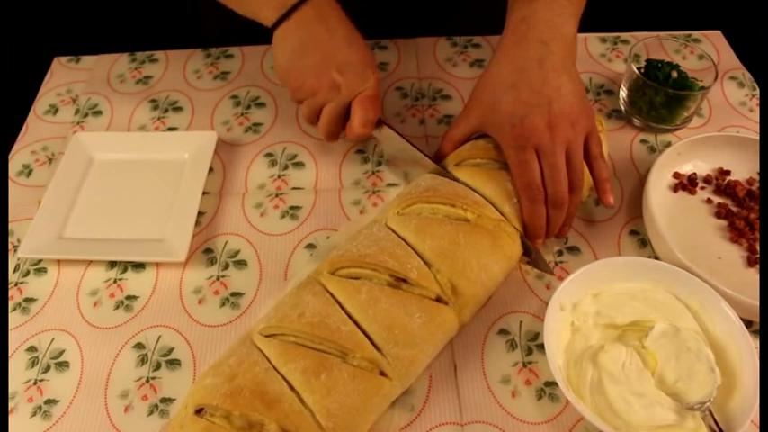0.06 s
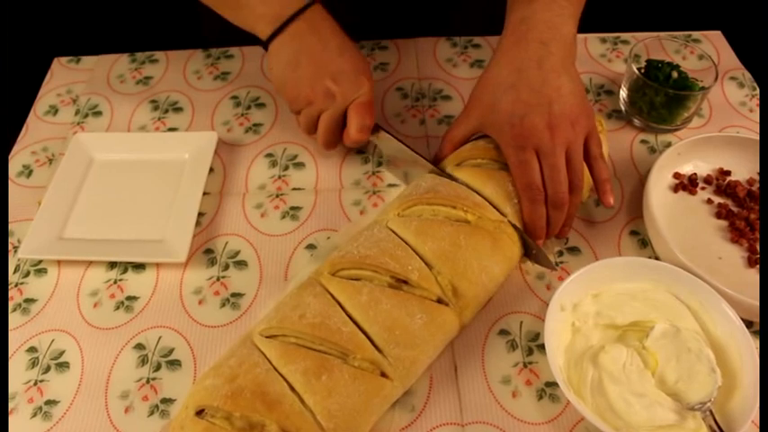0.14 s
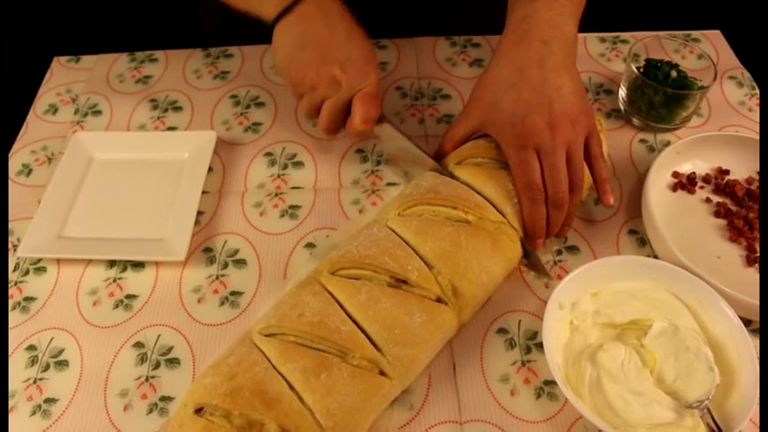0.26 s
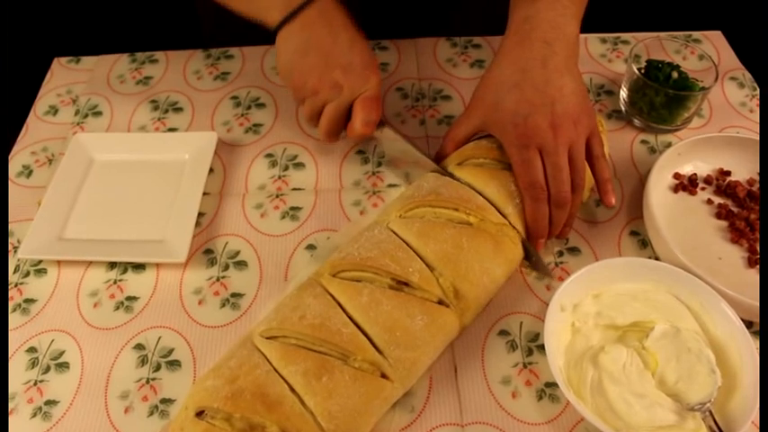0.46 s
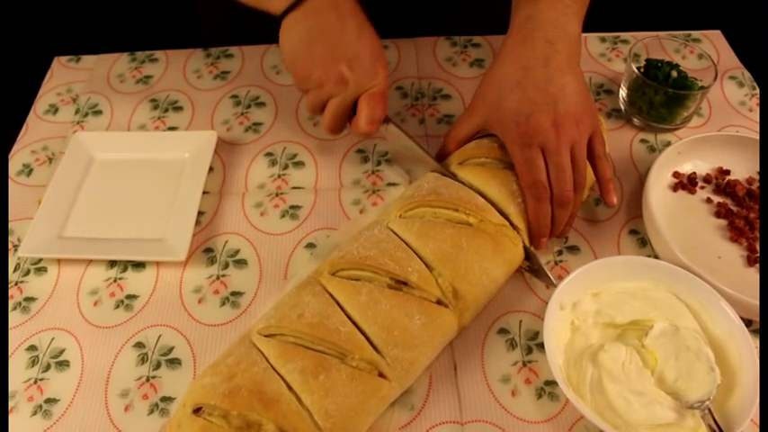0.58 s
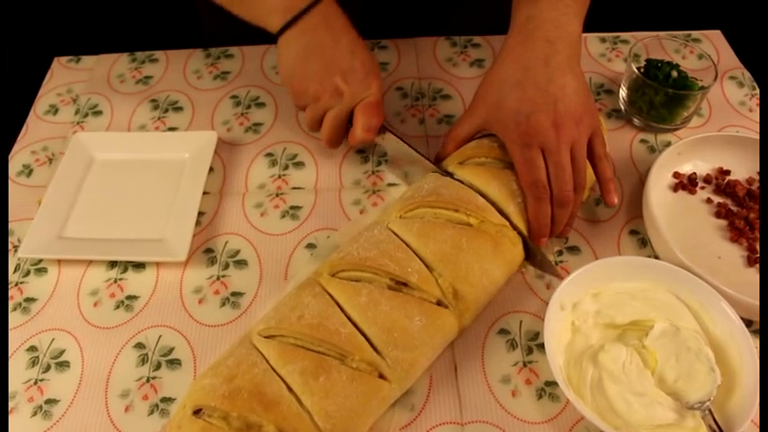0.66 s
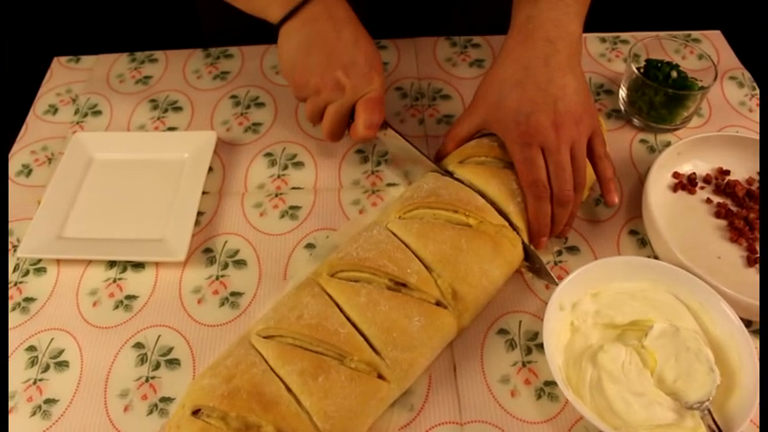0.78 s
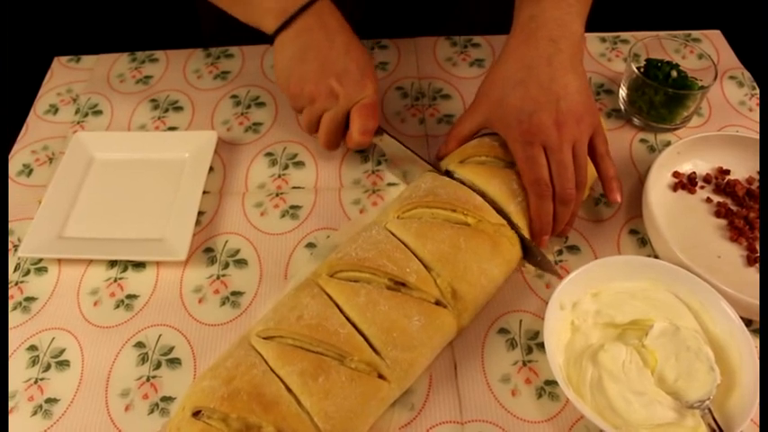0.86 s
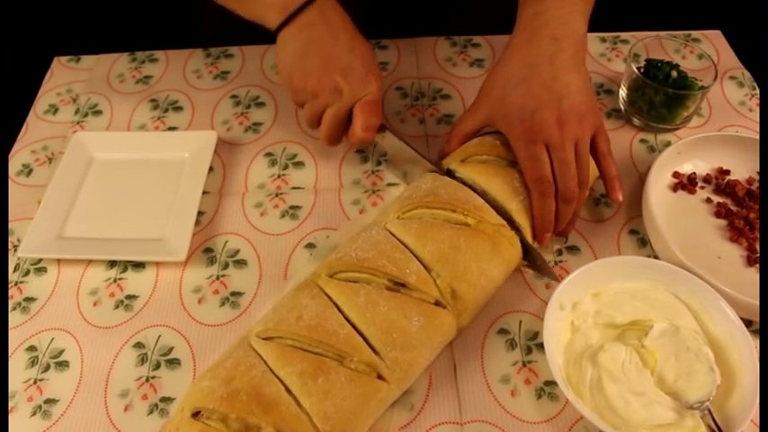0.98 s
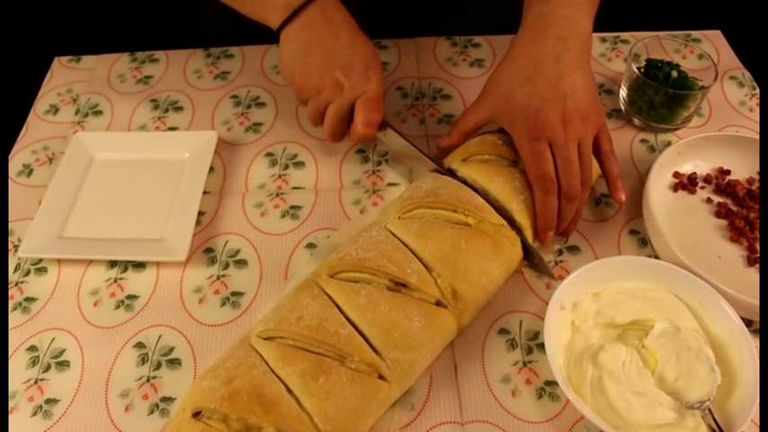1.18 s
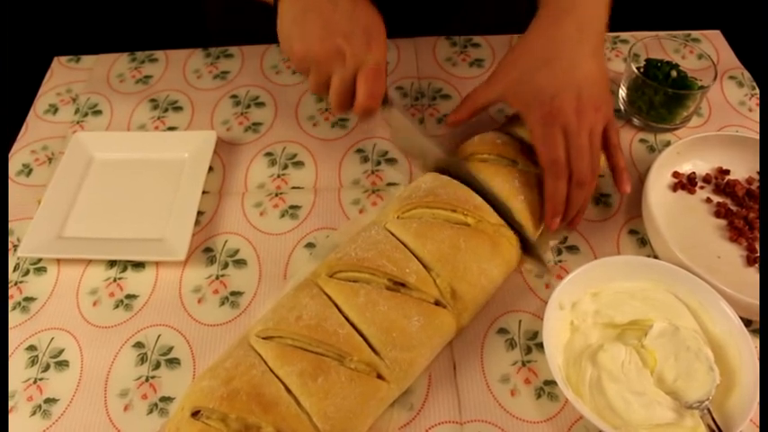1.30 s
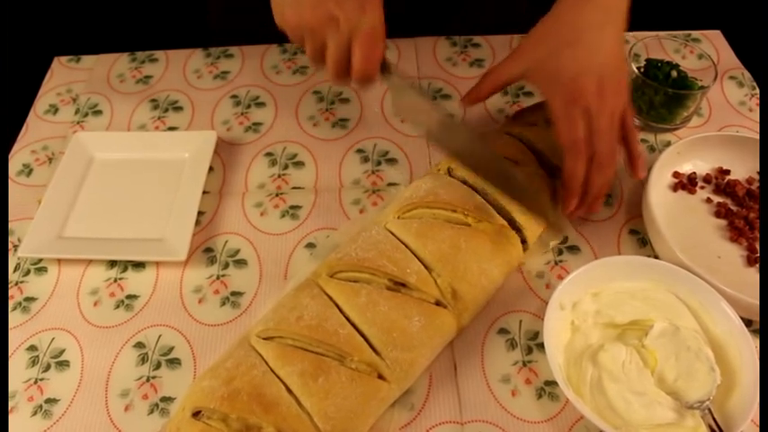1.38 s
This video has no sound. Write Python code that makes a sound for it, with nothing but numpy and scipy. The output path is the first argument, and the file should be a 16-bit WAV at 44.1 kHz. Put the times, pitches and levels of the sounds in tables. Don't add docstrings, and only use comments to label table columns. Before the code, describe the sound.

A large knife saws through a crusty baked loaf: light rasping, a low thump as the blade drops, hard knocks on the table, then sharp crust snaps; close stereo microphones in a quiet, hard-walled kitchen.

```python
import sys
import numpy as np
from scipy import signal
from scipy.fft import rfft, irfft, next_fast_len
from scipy.io import wavfile
from scipy.ndimage import uniform_filter1d

SR = 44100
rng = np.random.default_rng(int(sys.argv[2]) if len(sys.argv) > 2 else 0)


def boost(x):
    u = np.asarray(x, float) / 20
    return 10 ** u


def wav_out(sig):
    wavfile.write(sys.argv[1], SR, np.round(np.clip(np.atleast_2d(sig).T, -1, 1) * 32767).astype(np.int16))


N = 63945


def evened(x):
    return x / np.sqrt(np.mean(x ** 2) + 1e-20)


def read(points, hz):
    f, value = np.transpose(points)
    return np.interp(np.log(hz + 1), np.log(f + 1), value)


def coloured(x, points, scale=1):
    size = next_fast_len(x.shape[-1] + 4096)
    gain = boost(scale * read(points, np.fft.rfftfreq(size, 1 / SR)))
    return irfft(rfft(x, size) * gain, size)[..., :x.shape[-1]]


def high(x, hz, order=2):
    return signal.sosfilt(signal.butter(order, hz, "high", fs=SR, output="sos"), x)


def spread(mid, side):
    # f/Hz, level/dB
    width = [(40, -2), (150, -8.5), (400, -11), (1000, -8.5), (2500, -4), (5000, -1), (9000, 1.5),
             (15000, 0)]
    side = coloured(side, width)
    return np.array([mid + side, mid - side])


def quiet():
    # f/Hz, level/dB
    air_colour = [(15, -38), (25, 0), (149, 5.5), (285, 9), (624, 4), (754, 4.5), (2840, -3.5),
                  (8590, -13.5), (16000, -24)]
    # f/Hz, rms level/dB
    hum_partials = [(128, -60.5), (387, -60)]
    air_db = -51
    air = coloured(rng.standard_normal((2, N)), air_colour)
    t = np.arange(N) / SR
    smoothed = uniform_filter1d(rng.standard_normal(N), 2000)
    waver = evened(uniform_filter1d(smoothed, 2000))
    warped_t = t + np.cumsum(0.004 * waver) / SR
    hum = np.zeros(N)
    for db, hz in [(level, f) for f, level in hum_partials]:
        hum += boost(db + 0.5 * waver) * np.sqrt(2) * np.sin(2 * np.pi * hz * warped_t)
    return boost(air_db) * spread(*evened(air)) + hum


def kitchen(x):
    # f/Hz, t60/s
    decay_times = [(60, 0.21), (200, 0.36), (500, 0.42), (1500, 0.46), (4000, 0.47), (9000, 0.29),
                   (16000, 0.64)]
    # delay t/s, level/dB
    reflections = [(.0031, -10), (.0055, -7.5), (.0086, -17), (.013, -17), (.019, -19)]
    tail_db, rise_s, delay_s = -3.5, 0.0043, 0.0024
    taps = np.zeros((2, SR))
    at = np.arange(0, SR - 20, 20) + rng.integers(0, 20, (2, SR // 20 - 1))
    np.put_along_axis(taps, at, rng.choice([-1., 1.], at.shape), 1)
    hz, t, bands = signal.stft(taps, SR, nperseg=256)
    decay = boost(-60 * t / read(decay_times, hz)[:, None])
    tail = signal.istft(bands * decay, SR, nperseg=256)[1]
    tail = tail * np.clip((np.arange(tail.shape[1]) / SR - delay_s) / rise_s, 0, 1)
    tail = boost(tail_db) * tail / np.linalg.norm(tail[0])
    early = np.zeros_like(tail)
    for k, (s, db) in enumerate(reflections):
        early[:, round(s * SR)] = boost(db) * np.array([1, .5 * (-1) ** k])
    response = tail + high(early, 1390, order=1)
    return spread(*signal.fftconvolve(x[None], response, axes=1)[:, :N])


def swells(rows):
    t, skew = np.arange(N) / SR, 0.72
    envelope = np.zeros(N)
    for s, length, db in rows:
        progress = np.clip((t - s) / length, 0, 1)
        envelope += boost(db) * np.sin(np.pi * progress ** skew)
    return envelope


def fractures(per_s, colour):
    spread_db = 4.5
    size = boost(spread_db * np.minimum(rng.exponential(1, N), 3.5)) * rng.choice([-1., 1.], N)
    breaks = rng.random(N) < per_s / SR
    return evened(coloured(size * breaks, colour))


def crackle():
    # f/Hz, level/dB
    crust_colour = [(1060, -60), (1800, -1.5), (2740, -5), (3610, -6.5), (4330, -7), (8360, -12),
                    (16000, -20.5)]
    # f/Hz, level/dB
    crumb_colour = [(100, -15), (250, 1.5), (450, 0.5), (1000, 1), (2000, -14.5), (5000, -56)]
    # start t/s, length t/s, crackle level/dB
    strokes = [(.04, 0.16, -54.5), (0.183, 0.031, -41.5), (0.31, 0.06, -62), (0.449, 0.18, -56),
               (0.574, 0.12, -48.5), (0.686, 0.088, -42.5), (0.812, 0.034, -49.5), (0.873, 0.073, -49),
               (0.928, .1, -50.5), (1.03, 0.1, -48.5), (1.19, .08, -43), (1.363, 0.042, -48.5)]
    # start t/s, length t/s, level/dB
    crushes = [
        (.185, 0.045, -32.5),
        (.205, 0.085, -29.5),
        (.71, 0.053, -34),
        (.93, 0.05, -41),
        (1.03, 0.086, -62),
        (1.2, 0.053, -41.5),
    ]
    crackle_db, idle_db = 1.5, -87
    crust = fractures(3000, [(200, -30)] + list(crust_colour))
    crust = crust * boost(crackle_db) * (swells(strokes) + boost(idle_db))
    crumb = fractures(900, crumb_colour) * swells(crushes)
    return crust + crumb


def blips(rows):
    out = np.zeros(N)
    for s, db, hz, cycles in rows:
        turns = np.maximum((np.arange(N) / SR - s) * hz + 3 / 4, 0)
        swing = turns ** 2 * np.exp(-3 * turns / cycles) * np.sin(2 * np.pi * turns)
        out += boost(db) * swing / abs(swing).max()
    return out


def knocks():
    # peak t/s, peak level/dB, f/Hz, length/cycles
    blow_rows = [(.075, -38, 350, 0.63), (.1885, -29, 300, 0.51), (.194, -26, 400, 1.5),
                 (.2056, -3.5, 319, 0.55), (.2043, -14.5, 1105, 0.71), (.2065, -16.5, 610, 1.15),
                 (.26, -31, 102, 0.63), (.33, -46, 90, 1.5), (.5845, -22.5, 260, 2.1),
                 (.5995, -9, 417, 1.04), (.6002, -7, 1047, 1.78), (.6016, -10.5, 1476, 2.4),
                 (.5985, -19.5, 2120, 1.8), (.614, -11, 1100, 1.8), (.627, -15, 926, 2.04),
                 (.7335, -27.5, 556, 1), (.745, -47.5, 61, 1), (.587, -24.5, 1270, 0.62),
                 (.9385, -32.5, 409, 2.1), (.939, -21, 1400, 0.96), (1.0405, -38.5, 278, 0.73),
                 (1.0535, -32.5, 306, 1.3), (1.189, -29, 600, 1.54), (1.224, -24, 900, 0.82),
                 (1.2362, -17.5, 389, 0.81)]
    # f/Hz, level/dB, t60/s
    modes = [(75, -35, 0.23), (106, -14.5, 0.25), (197.6, -8, 0.39), (249.2, 2, 0.053),
             (397.4, -8.5, 0.067), (490, -26, 0.096), (636, -14, 0.091), (889, -11.5, 0.067),
             (940, -34, 0.12), (1100, -28, 0.05), (1399, -7, 0.04)]
    table_db = -14.5
    t = np.arange(SR // 2) / SR
    ring = np.zeros(len(t))
    for hz, db, t60 in modes:
        decay = boost(db - 60 * t / min(t60, 1 / 4))
        ring += decay * np.sin(2 * np.pi * hz * t) * 2 * np.pi * hz / SR
    blows = blips(blow_rows)
    return blows + boost(table_db) * signal.fftconvolve(blows, ring)[:N]


def snaps():
    # peak t/s, peak level/dB, f/Hz, length/cycles
    plate_breaks = [(0.075, -22, 6000, 1.1), (0.0745, -29, 1800, 1.14), (.089, -18, 3700, 1),
                    (0.118, -33, 8000, 2), (.192, -30, 2250, 0.88), (1.181, -38, 2550, 1.7),
                    (0.2039, -16, 2530, 1.56), (0.3287, -28.5, 8500, 1.4), (.334, -55, 8500, 4),
                    (0.554, -28.5, 3500, 0.52), (.598, -19.5, 4170, 0.68), (0.702, -21, 2310, 1.33),
                    (.732, -19, 4000, 1.2), (0.7409, -19, 2620, 2), (.832, -38, 7100, 3),
                    (0.876, -32.5, 7560, 1.5), (0.9195, -20.5, 2550, 1.2), (0.935, -19.5, 3450, 0.47),
                    (0.9376, -8.5, 2830, 0.89), (.971, -28, 7300, 0.89), (1.077, -61, 6000, 1.3),
                    (1.1878, -18, 3400, 0.6), (1.1889, -13, 2170, 1), (1.1975, -20, 1900, 1.1),
                    (1.2219, -16, 3060, 0.47), (1.2245, -14.5, 2240, 0.69), (1.2479, -2, 2870, 0.68),
                    (1.2487, -31, 5700, 1.9), (1.375, -29, 7400, 2.6), (1.383, -59, 7500, 3.2)]
    splinter_db, splinter_s, splinter_hz = -26.5, 0.0007, 4900
    shard_db, shard_s, shard_octaves = -13.5, 0.0018, 1.73
    t, splinter_envelope, shards = np.arange(N) / SR, np.zeros(N), np.zeros(N)
    splinter_noise, shard_noise = rng.standard_normal((2, N))
    half_band = 2 ** (shard_octaves / 2)
    for s, db, hz, cycles in plate_breaks:
        after = np.maximum(t - s, 0)
        splinter_envelope += boost(db + splinter_db) * (t > s) * np.exp(-after / splinter_s)
        band = signal.butter(2, [hz / half_band, min(hz * half_band, SR / 2.2)], "band", fs=SR)
        grit = evened(signal.lfilter(*band, shard_noise))
        shards += boost(db + shard_db) * (t > s) * np.exp(-after / shard_s) * grit
    splinters = high(splinter_envelope * splinter_noise, splinter_hz)
    return splinters + shards - blips(plate_breaks)


def scene():
    cut = crackle() + knocks() + snaps()
    return quiet() + kitchen(cut) + cut


def low_pass(x):
    return signal.sosfilt(signal.butter(12, 16650, fs=SR, output="sos"), x)


def record(dry):
    # f/Hz, level/dB
    lean = [(60, -2.5), (200, -1.5), (400, -2), (800, -3), (1600, -2.5), (3000, -.4), (6000, 1),
            (12000, -0.2)]
    leaning = np.array([coloured(dry[0], lean, .5), coloured(dry[1], lean, -.5)])
    without_bass = high(leaning, 65, order=3)
    dulled = signal.lfilter(*signal.butter(2, 11900, fs=SR), without_bass)
    return low_pass(dulled)


dry = scene()
out = record(dry)
wav_out(out)
```